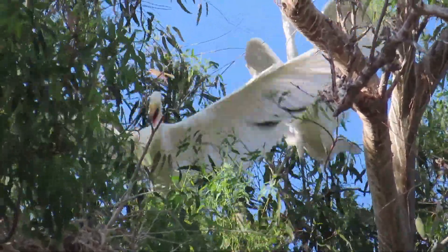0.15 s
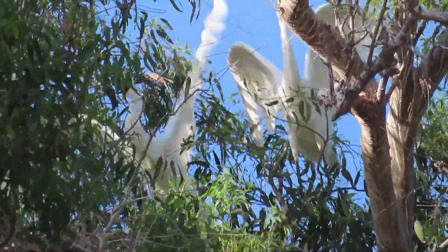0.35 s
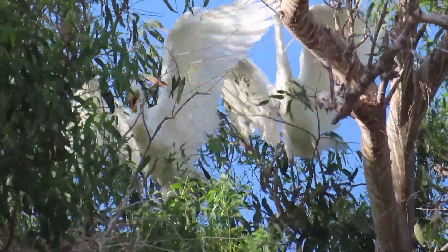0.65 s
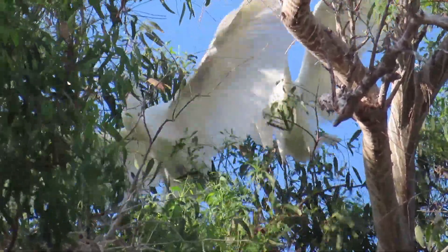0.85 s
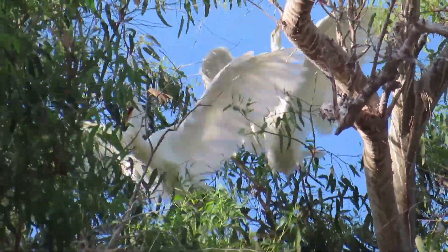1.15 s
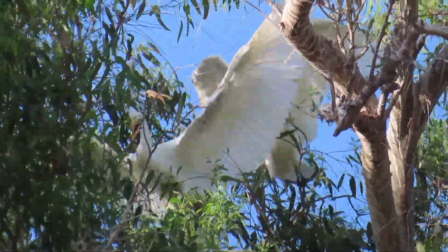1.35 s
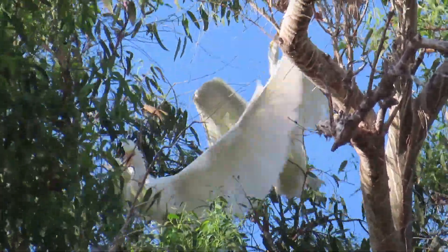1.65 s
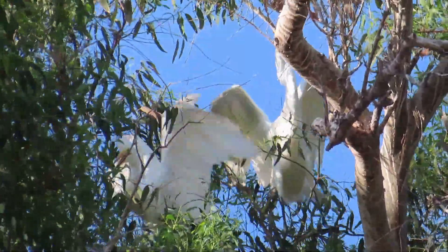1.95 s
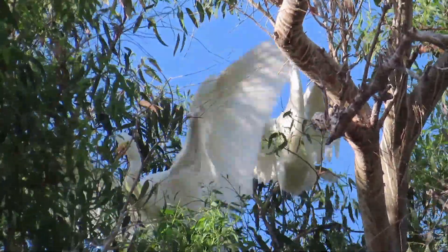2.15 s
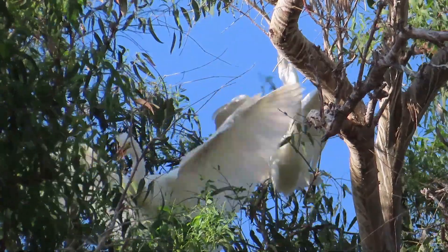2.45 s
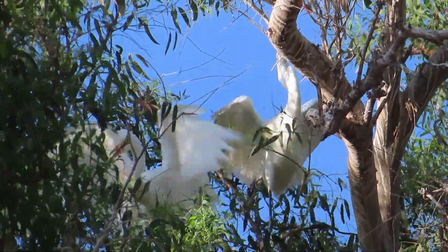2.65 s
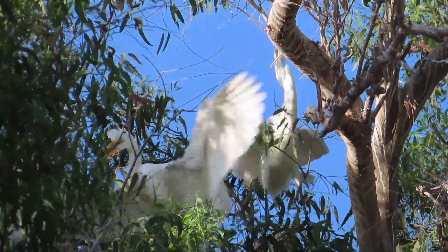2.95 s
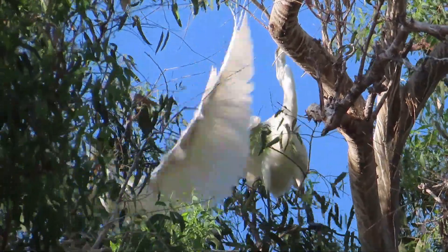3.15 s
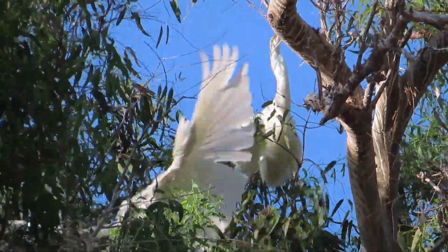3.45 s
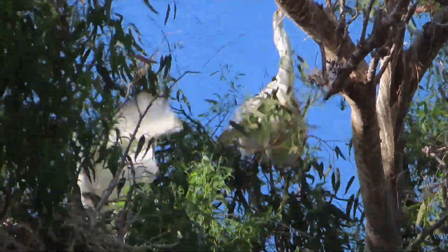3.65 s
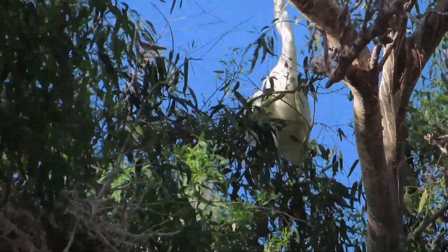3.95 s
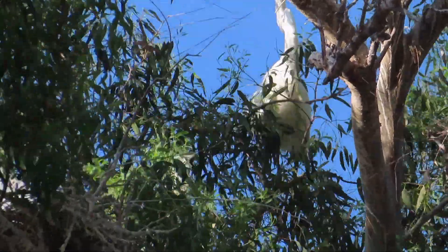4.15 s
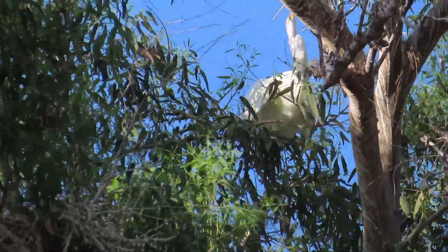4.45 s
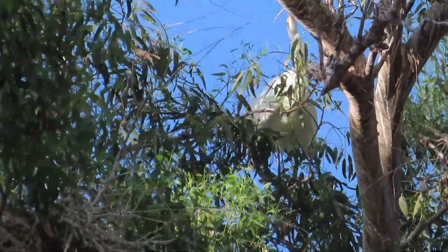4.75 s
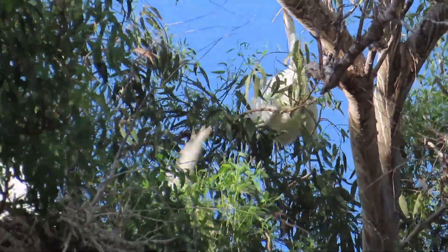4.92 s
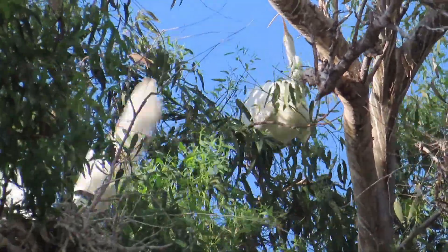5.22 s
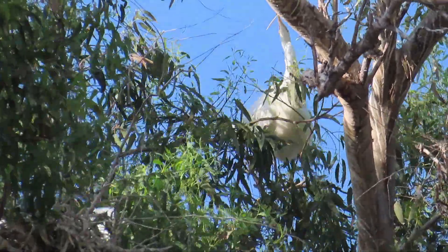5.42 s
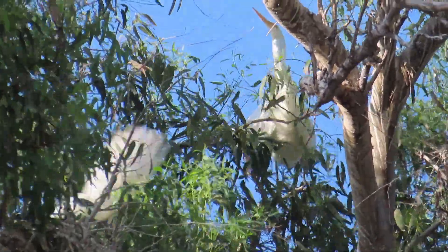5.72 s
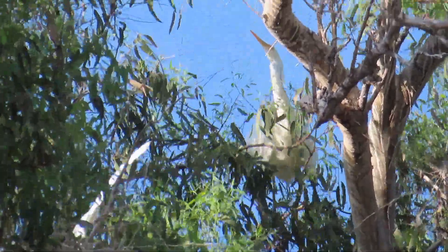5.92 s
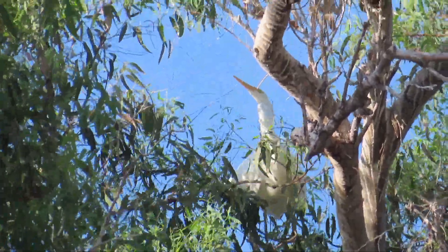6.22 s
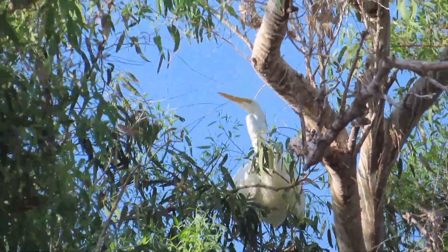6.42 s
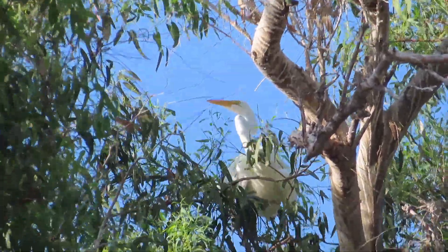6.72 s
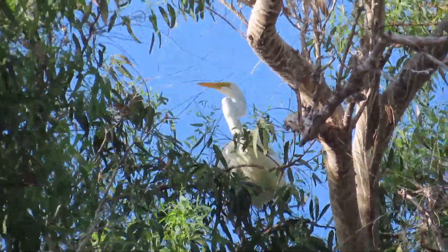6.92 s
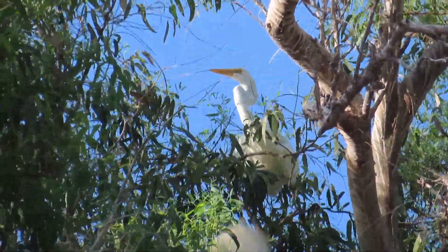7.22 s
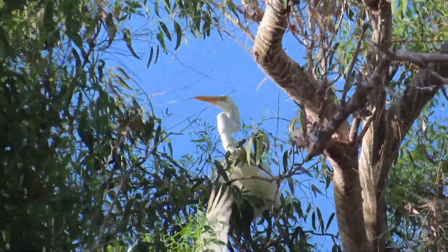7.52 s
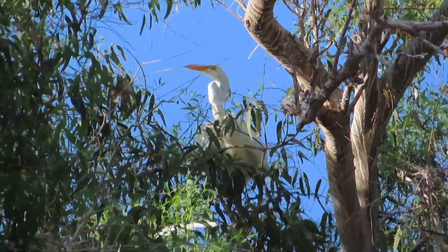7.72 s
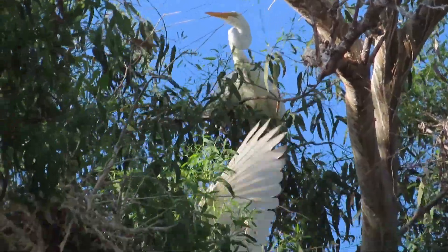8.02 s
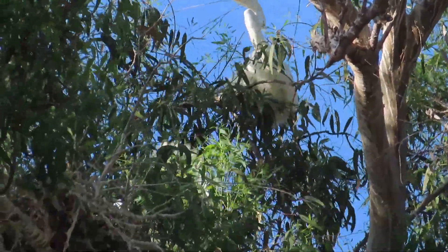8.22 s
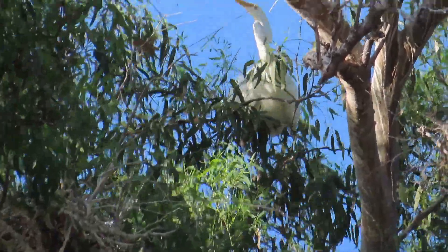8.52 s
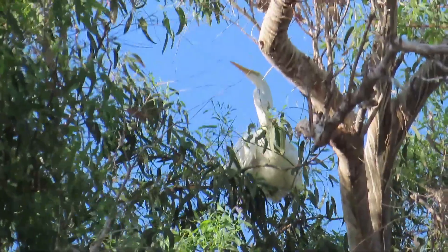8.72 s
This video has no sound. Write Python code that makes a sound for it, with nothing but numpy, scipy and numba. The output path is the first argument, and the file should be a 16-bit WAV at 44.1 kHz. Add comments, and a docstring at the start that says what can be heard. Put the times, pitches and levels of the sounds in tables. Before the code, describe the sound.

Egret chicks in a treetop nest beg with rapid, steady ticking keks, then hoarse rasping squawks, over colony hum and thumping wind.

```python
"""Short ticking keks and a long hoarse squawk open over a colony's hum: egret chicks beg in a treetop nest.
Both voices are pulse trains mixed with puffed air, ringing windpipe, throat, beak and upper resonances.
Brief clear whistles, harmonics of the calls lifted out by a narrow resonance, are made as near sines.
One ground bounce and a diffuse leafy tail echo the chicks.
Behind them lie coloured-noise hum, a throbbing low drone, and wind that rumbles and thumps on two ports."""
import sys
import numpy as np
from scipy import signal
from scipy.fft import rfft, irfft
from scipy.io import wavfile
from scipy.ndimage import uniform_filter1d
from numba import njit

SR = 44100
rng = np.random.default_rng(int(sys.argv[2]) if len(sys.argv) > 2 else 0)


def dump_mix(stems):
    """Bounce the given channels to the path in sys.argv[1] as a 16-bit WAV at rate SR."""
    frames = np.atleast_2d(stems).T  # one column per channel
    limited = np.clip(frames, -1, 1)  # hard clip at full scale
    pcm = np.round(limited * 32767).astype(np.int16)
    wavfile.write(sys.argv[1], SR, pcm)


N = 391166
T = np.arange(N) / SR


def undb(db):
    """Gain of a level in dB."""
    return 10 ** (np.asarray(db) / 20)


def level(x, db):
    """Set the rms level over the whole signal."""
    return x * undb(db) / np.sqrt(np.mean(x ** 2))


def walk(rate):
    """Random levels held 1 / rate s and smoothed twice; spread near 1."""
    hold = int(SR / rate)
    steps = np.repeat(rng.standard_normal(N // hold + 1), hold)
    return 1.51 * uniform_filter1d(uniform_filter1d(steps, hold), hold)[:N]


@njit
def svf(x, hz, width):
    """State-variable band-pass whose centre and width may move; gain 1 at the centre."""
    y, band, low = np.empty(len(x)), 0., 0.
    for i in range(len(x)):
        g, damping = np.tan(np.pi * hz[i] / SR), width[i] / hz[i]
        v = (band + g * (x[i] - low)) / (1 + g * (g + damping))
        band, low = 2 * v - band, low + 2 * g * v
        y[i] = damping * v
    return y


def ring(x, hz, width_hz):
    """A steep resonance: the band-pass twice, evened out for changes of width and set to rms 1."""
    centre, width = hz * np.ones(N), width_hz * np.ones(N)
    twice = svf(svf(x, centre, width), centre, width)
    return level(twice / np.sqrt(width), 0)


# How alike the air sounds at left and right: (f/Hz, correlation 0-1)
LIKENESS = [(30, 0.96), (130, 0.96), (300, 0.68), (640, 0.95), (2000, 0.84), (6800, 0.28), (15000, 0.038)]


def airy(spectrum):
    """Stereo noise of a given colour: mid and side are balanced per frequency to set the likeness."""
    f = np.log(np.fft.rfftfreq(N, 1 / SR) + 1)

    def read(table):
        hz, value = np.array(table).T
        return np.interp(f, np.log(hz), value)

    like, colour = np.clip(read(LIKENESS), 0, 1), undb(read(spectrum))
    mid = rfft(rng.standard_normal(N)) * colour * np.sqrt(1 + like)
    side = rfft(rng.standard_normal(N)) * colour * np.sqrt(1 - like)
    return level(irfft(np.array([mid + side, mid - side]), N), 0)


# Colour of the colony's hum: (f/Hz, relative level/dB per Hz)
HUM_COLOUR = [(140, -46), (230, -8.5), (375, -8), (768, -3.5), (1070, -11), (1630, -11), (1750, -10),
              (2010, -16), (2230, -16), (3280, -18.5), (5740, -26), (15000, -45)]
HUM_DB = -43  # centre of its slow wander


def hum():
    """Coloured stereo noise whose level wanders slowly."""
    return airy(HUM_COLOUR) * undb(HUM_DB + 1.66 * walk(1.88))


DRONE_HZ, DRONE_DB = 190.4, -46  # the level is that of the tone's peaks before the throb
THROB_S, CREST_S = .2628, 6.2  # period, and the time of one crest


def drone():
    """A far-off low tone, narrow-band noise held even, that swells and fades in a steady beat."""
    tone = ring(rng.standard_normal(N), DRONE_HZ, 7.5)
    even = tone / np.sqrt(2 * uniform_filter1d(tone ** 2, size=900))
    throb = 1 + np.cos(2 * np.pi * (T - CREST_S) / THROB_S)
    return undb(DRONE_DB) * even * throb


# Single eddies hitting the ports, before the pressure leak:
# (t/s, left level/dB, right level/dB, f/Hz of the main swing)
EDDIES = [(0.073, -13.5, -12.5, 148), (0.951, -9.5, -7.5, 126), (1.094, -14, -16, 145),
          (1.199, -7, -6.5, 207), (1.245, -12, -8.5, 174), (1.889, -6, -14, 130), (1.954, -10.5, -11, 113),
          (2.257, -6, -6.5, 133), (2.301, -14, -17, 126), (2.324, -9.5, -7.5, 190),
          (2.359, -15, -12.5, 170), (2.448, -14, -17, 128), (2.519, -15.5, -12, 121),
          (2.563, -7.5, -8.5, 169.6), (2.597, -13, -8.5, 146), (2.634, -15.5, -19.5, 160),
          (3.051, -14.5, -10.5, 200.4), (3.12, -12.5, -12, 153.3), (3.152, -8, -11, 175.3),
          (3.31, -16, -16, 189), (3.64, -19.5, -19.5, 130), (3.769, -7.5, -13.5, 257.6),
          (3.911, -21.5, -23, 167), (3.939, -26, -26, 119.4), (3.995, -27, -24.5, 173),
          (4.103, -10.5, -12, 227), (4.159, -24, -25, 147.6), (4.112, -17, -22, 148.1),
          (4.271, -9.5, -13.5, 177.8), (4.321, -10.5, -12, 153.8), (4.704, -13, -14, 124),
          (5.513, -14.5, -10, 104), (5.541, -4.5, -8.5, 240), (5.556, -2.5, -1.5, 243),
          (5.59, -3, -1.5, 226), (5.62, -10, -15, 197), (5.658, -8, -14.5, 178), (5.686, -25.5, -23, 151),
          (5.715, -22, -17.5, 296), (5.842, -35, -20, 298.5), (6.985, -11.5, -19, 145),
          (8.072, -16, -17.5, 155.1), (8.51, -14, -15, 227), (8.537, -13, -15, 206),
          (8.587, -16, -16.5, 228), (8.636, -19.5, -18, 212), (8.801, -8, -14, 173.3)]
# Slow curve of the rumble's strength, before its trim and lurching: (t/s, level/dB)
GUST_LEVEL = [(0.0, -38), (0.44, -44.5), (2.27, -38), (2.42, -37), (2.74, -39.5), (4.91, -46.5),
              (5.39, -40.5), (6.22, -49), (7.78, -46), (8.3, -38.5), (8.6, -35), (8.87, -44)]
# Colour of the rumble: (f/Hz, relative level/dB per Hz)
RUMBLE_COLOUR = [(25, -1), (60, 12), (130, 10), (220, 2), (400, -13.5), (600, -29.5), (1000, -59),
                 (3000, -110)]
# Colour of the air churned round an eddy: (f/Hz, relative level/dB per Hz)
CHURN_COLOUR = [(40, 2.5), (150, 4.5), (350, -4.5), (520, -24), (1000, -76)]
PORT_LAG_S = 0.0013  # time an eddy takes from one port to the other
PORT_LOW_HZ = 60.5  # the ports let slower pressure swings leak away


def wind():
    """Low rumble lurches at random round a slow gust curve; single eddies thump each port and churn the air."""
    gust = undb(np.interp(T, *np.transpose(GUST_LEVEL)) + 2.5 + 4.0 * walk(25))
    thumps, churn, span = np.zeros((2, N)), np.zeros((2, N)), np.arange(-3000, 3000)
    chance = rng.standard_normal((len(EDDIES), 3))
    for (s, left_db, right_db, hz), (turn, lag, late) in zip(EDDIES, chance):
        at = np.clip(int(s * SR) + span, 0, N - 1)
        for port, db in enumerate((left_db, right_db)):
            # the sign of `late` picks the port that is hit first
            cycles = (span / SR - port * PORT_LAG_S * np.sign(late)) * hz
            bump = np.exp(-(cycles / 0.58) ** 2)
            swing = np.cos(2 * np.pi * cycles + np.pi * turn + port * 0.78 * lag)
            overtone = undb(-9.0) * np.cos(2 * np.pi * 1.68 * cycles + np.pi * lag)
            thumps[port, at] += undb(db) * bump * (swing + overtone)
            churn[port, at] += undb(db - 13.5) * np.exp(-np.abs(span) / SR / 0.012)
    leak = signal.butter(1, PORT_LOW_HZ, "high", fs=SR, output="sos")
    return signal.sosfilt(leak, thumps) + churn * airy(CHURN_COLOUR) + gust * airy(RUMBLE_COLOUR)


GROUND_LAG_S, GROUND_DB = .00582, -4
LEAVES_T60_S, LEAVES_DB = 0.43, -7.5  # level before the treble is swallowed
LEAVES_TOP_HZ = 5150  # leaves swallow the treble


def echoes(voice):
    """One bounce off the ground, and a diffuse tail scattered by trunks and leaves."""
    lag = int(GROUND_LAG_S * SR)
    near = voice + undb(GROUND_DB) * np.concatenate([np.zeros(lag), voice[:-lag]])
    t = np.arange(SR // 2) / SR
    decay = undb(-60 * t / LEAVES_T60_S) * np.clip(t / 0.0033, 0, 1)
    mid, side = rng.standard_normal((2, len(t))) * decay
    tail = np.array([mid + 0.025 * side, mid - 0.25 * side])
    tail = signal.sosfilt(signal.butter(2, LEAVES_TOP_HZ, fs=SR, output="sos"), tail)
    tail = tail * undb(LEAVES_DB) / np.sqrt(np.sum(mid ** 2))
    return undb(-0.58) * near + signal.fftconvolve(voice[None], tail, axes=1)[:, :N]


@njit
def fire(hz, stretch, size, restart):
    """A pulse at each phase wrap, shared between two samples; cycle lengths vary; a restart begins a new cycle."""
    pulses, phase, p, k = np.zeros(len(hz) + 1), np.empty(len(hz)), 0., 0
    for i in range(len(hz)):
        step = hz[i] * stretch[k] / SR
        p = np.floor(p + .6) if restart[i] > 0 else p + step
        if p >= 1:
            p, k = p - 1, k + 1
            pulses[i] += size[k] * p / step
            pulses[i + 1] += size[k] * (1 - p / step)
        phase[i] = p
    return pulses[:-1], phase


def syrinx(hz, rough, restarts_s):
    """Membrane slaps mixed with air that puffs once a cycle; the rougher the voice, the more the rate stumbles."""
    length_chance, size_chance = np.clip(rng.standard_normal((2, N // 50)), -2, 2)
    stumble = 1 + .06 * rough * walk(90)
    restart = np.zeros(N)
    restart[(restarts_s * SR).astype(int)] = 1
    pulses, phase = fire(hz * stumble, 1 + .004 * length_chance, undb(1.3 * size_chance), restart)
    air = np.exp(-phase / .5) * rng.standard_normal(N)
    air_share = .55 * rough
    return np.sqrt(1 - air_share) * level(pulses, 0) + np.sqrt(air_share) * level(air, 0)


# Upper resonances that make the rasp; each call sets the first one's pitch, and spread scales the widths:
# (f/Hz, width f/Hz, relative level/dB before dulling)
RASP_RINGS = [(3410, 1840, 15), (6100, 600, 4.5), (7940, 800, 2), (10000, 2700, -4.5), (11900, 880, -13)]
WINDPIPE_HZ, WINDPIPE_WIDTH_HZ = 1327, 324  # width at spread 1


def tract(source, width_hz, throat_hz, beak_hz, rasp_hz, throat_db, beak_db, rasp_db, pipe_db, dull_db, spread):
    """Windpipe, throat, beak and upper resonances; a restless tongue shifts each and makes it flicker."""
    def restless(x, hz, width):
        return undb(1.4 * walk(60)) * ring(x, hz * (1 + .028 * walk(30)), width)

    soft = signal.sosfilt(signal.butter(4, 4600, fs=SR, output="sos"), source)
    # the neck stretches and shifts the rings above the first together
    drift = 1 + .05 * walk(5)
    # each slap rattles briefly, more in a wide-open throat
    rattle = rng.standard_normal(N) * np.sqrt(np.abs(uniform_filter1d(source ** 2, size=70)))
    smeared = source + .7 * spread * rattle
    rasp = np.zeros(N)
    for k, (hz, width, db) in enumerate(RASP_RINGS):
        centre = hz * drift if k else rasp_hz
        rasp += undb(db - k * dull_db) * restless(smeared, centre, spread * width)
    rasp = level(rasp, -1.14)
    throat = undb(throat_db) * restless(soft, throat_hz, width_hz)
    beak = undb(beak_db) * restless(soft, beak_hz, width_hz)
    windpipe = undb(pipe_db) * restless(soft, WINDPIPE_HZ, spread * WINDPIPE_WIDTH_HZ)
    # neighbours in opposite sign keep the valleys dark
    return throat - beak - windpipe + undb(rasp_db) * rasp


# Whistled notes: (start t/s, rise t/s, fall t/s, crest f/Hz, glide in Hz/s, crest level/dB)
WHISTLE_NOTES = [(0.182, 0.031, 0.046, 1980, 396, -25.5), (3.355, 0.031, 0.059, 1845, -1400, -35.5),
                 (3.365, 0.023, 0.046, 3700, -1500, -43.5), (3.44, 0.015, 0.023, 3600, -300, -46),
                 (3.565, 0.05, 0.049, 1333, -200, -39), (6.047, 0.011, 0.046, 1995, -900, -31.5),
                 (6.07, 0.025, 0.02, 2260, 0, -38), (4.65, 0.067, 0.094, 1697, -300, -48),
                 (5.11, 0.013, 0.053, 1852, -1500, -30.5), (5.82, 0.039, 0.047, 3610, -500, -44),
                 (6.353, 0.016, 0.014, 1323, 998, -33.5), (6.43, 0.033, 0.21, 3564, -1300, -38),
                 (6.51, 0.061, 0.018, 3684, -500, -36), (7.04, 0.028, 0.079, 3630, -2000, -42.5),
                 (7.075, 0.032, 0.042, 1358, -1200, -41.5), (7.435, 0.012, 0.038, 1180, 2500, -42),
                 (7.53, 0.018, 0.049, 4073, -1000, -42), (8.325, 0.018, 0.018, 1353, 500, -38.5),
                 (8.395, 0.012, 0.015, 1757, 500, -40), (8.395, 0.0392, 0.033, 3537, 2500, -39.5),
                 (6.959, 0.056, 0.062, 2790, -5000, -37.5), (7.07, 0.086, 0.029, 2353, -220, -24.5),
                 (7.17, 0.022, 0.025, 1927, -2300, -31.5), (7.5, 0.042, 0.029, 2724, -1500, -35.5),
                 (7.555, 0.039, 0.045, 1996, -3700, -43), (7.61, 0.052, 0.033, 1382, -800, -39.5),
                 (8.445, 0.024, 0.067, 2770, -700, -39), (8.526, 0.026, 0.02, 2807, -300, -33.5)]
WHISTLE_RISE_DB, WHISTLE_FALL_DB = 9.5, 4  # below the crest at start and end


def whistles():
    """Clear harmonics of the calls that a narrow resonance lifts out: each a near sine with a weak octave."""
    out, waver = np.zeros(N), walk(60)
    for start, rise, fall, hz, glide, db in WHISTLE_NOTES:
        top, end = start + rise, start + rise + fall
        on = slice(int(start * SR), int(end * SR))
        t = T[on]
        pitch = (hz + glide * (t - top)) * (1 + 0.002 * waver[on])
        turn = 2 * np.pi * np.cumsum(pitch) / SR
        tone = np.sqrt(2) * (np.sin(turn) + undb(-25) * np.sin(2 * turn))
        swell_db = np.interp(t, (start, top, end), (-WHISTLE_RISE_DB, 0, -WHISTLE_FALL_DB))
        gate = np.clip(np.minimum(t - start, end - t) / 0.0054, 0, 1)
        out[on] += tone * undb(db + swell_db) * gate
    return out


# How far each resonance lies below its crest at full sag: (start level/dB, end level/dB)
THROAT_SHAPE, BEAK_SHAPE, RASP_SHAPE, PIPE_SHAPE = (19.6, 13), (27.4, 34), (35.5, 21), (2.6, 4.4)
SWELL_POWER = 1.41  # above 1 the crest is rounded


def crest(age, at, length, db, shape, sag):
    """Level in dB that swells to a crest at age `at`, then falls to the call's end; less sag holds it up."""
    before, after = np.clip(1 - age / at, 0, 2), np.clip((age - at) / (length - at), 0, 2)
    return db - sag * (shape[0] * before ** SWELL_POWER + shape[1] * after ** SWELL_POWER)


def fade(start, end, edge_s):
    """Gate that opens and shuts in edge_s."""
    return np.clip(np.minimum(T - start, end - T) / edge_s, 0, 1)


# Squawks: (start t/s, length t/s, throat fullest after t/s, beak widest after t/s,
# first pulse f/Hz, last pulse f/Hz, throat first f/Hz, throat last f/Hz, beak first f/Hz, beak last f/Hz,
# lowest rasp ring f/Hz, throat level/dB, beak level/dB, rasp level/dB, windpipe level/dB,
# roughness 0-1, share of the usual swell and fade)
SQUAWK_CALLS = [ (0.137, 0.4, 0.064, 0.19, 294.3, 245, 2150, 2040, 3750, 3170, 4130, -41, -40.5, -46.5, -50, 0.3, 0.26),
                (3.336, 0.22, 0.042, 0.038, 313.9, 276.3, 2270, 2240, 3580, 3500, 4100, -45.5, -46.5, -59, -62, 0.22, 0.28),
                (3.539, 0.24, 0.079, 0.08, 264.8, 234, 2560, 2380, 4015, 3720, 4400, -36.5, -48, -46, -45, 0.53, 0.34),
                (4.509, 0.078, 0.035, 0.044, 262, 238, 1757, 1445, 3170, 3100, 3940, -40.5, -49.5, -53, -61.5, 0.24, 0.63),
                (4.681, 0.22, 0.19, 0.22, 273, 258, 2610, 2220, 3430, 3000, 3850, -40, -40, -44.5, -48.5, 0.17, 0.35),
                (5.08, 0.32, 0.27, 0.13, 286.7, 251.4, 1817, 1907, 3270, 2875, 3980, -34, -34, -39.5, -44, 0.54, 0.58),
                (5.349, 0.23, 0.13, 0.053, 254.8, 231.9, 2130, 2440, 3480, 3380, 4054, -33, -45.5, -48.5, -48.5, 0.48, 0.24),
                (5.672, 0.35, 0.12, 0.18, 264.5, 234.2, 2390, 2450, 3340, 3520, 4000, -39, -40.5, -44, -46.5, 0.18, 0.83),
                (6.045, 0.22, 0.032, 0.045, 292, 265.1, 2013, 1893, 3900, 3583, 3940, -40, -51.5, -76.5, -59, 0.32, 0.38),
                (6.353, 0.25, 0.086, 0.15, 289.5, 255.3, 2643, 2620, 3720, 3500, 4140, -53.5, -40.5, -42, -46, 0.02, 0.66),
                (6.583, 0.11, 0.023, 0.011, 249.5, 231.6, 2700, 2720, 3480, 3520, 3600, -43.5, -51.5, -46.5, -48.5, 0.3, 0.27),
                (6.927, 0.28, 0.064, 0.068, 271.4, 226.2, 2900, 2190, 4180, 3393, 4690, -38, -50, -40, -42, 0.32, 0.89),
                (7.431, 0.3, 0.11, 0.1, 305.1, 229.9, 2400, 2935, 3950, 4600, 4400, -40.5, -57, -44, -42, 0.4, 0.94),
                (7.966, 0.088, 0.088, 0.049, 292, 303.4, 1700, 1860, 2670, 2680, 3500, -36.5, -49, -61, -68, 0.16, 0.82),
                (8.317, 0.39, 0.25, 0.16, 291.8, 225.6, 2560, 2360, 3720, 4000, 4780, -42.5, -48, -45, -45.5, 0.4, 0.73)]
SAG_SHARE = .78  # the pulse rate reaches its last value after this share of the call
PIPE_CREST_S = 0.022  # the low windpipe ring crests early in each call


def squawks():
    """Long hoarse calls on gliding pulse rates; a rough call comes through a wide-open throat with broad rings."""
    table = np.array(SQUAWK_CALLS)
    row = np.maximum(np.searchsorted(table[:, 0] - .01, T) - 1, 0)
    (start, length, full, wide, hz, hz_end, throat, throat_end, beak, beak_end, rasp,
     throat_db, beak_db, rasp_db, pipe_db, rough, sag) = table[row].T
    age, rough = T - start, np.clip(rough, 0, 1)
    hz = hz + (hz_end - hz) * np.clip(age / (SAG_SHARE * length), 0, 1)
    progress = np.clip(age / length, 0, 1)
    throat = throat + (throat_end - throat) * progress
    beak = beak + (beak_end - beak) * progress
    levels = (crest(age, full, length, throat_db, THROAT_SHAPE, sag),
              crest(age, wide, length, beak_db, BEAK_SHAPE, sag),
              crest(age, wide, length, rasp_db, RASP_SHAPE, sag),
              crest(age, PIPE_CREST_S, length, pipe_db, PIPE_SHAPE, sag))
    source = syrinx(hz, rough, table[:, 0])
    voice = tract(source, 330 + 1100 * rough, throat, beak, rasp, *levels,
                  dull_db=0, spread=.55 + 1.2 * rough)
    return voice * sum(fade(s - .01, s + lasts + .01, .021) for s, lasts in table[:, :2])


# Keks, with levels before the trims and pitches before the slides below:
# (t/s, length t/s, beak parted after t/s, windpipe level/dB, throat level/dB,
# beak level/dB, rasp level/dB, throat f/Hz, beak f/Hz)
KEK_CALLS = [(0.021, 0.069, 0.014, -47, -32.5, -32.5, -40, 2050, 3100),
             (0.24, 0.063, 0.0096, -49, -35.5, -40, -47.5, 1920, 2650),
             (0.403, 0.055, 0.004, -38, -33, -28, -46.5, 2150, 2710),
             (0.618, 0.076, 0.014, -38.5, -35, -39, -49.5, 2060, 2720),
             (0.778, 0.074, 0.0072, -40, -38, -34, -47.5, 2130, 2800),
             (0.993, 0.085, 0.017, -40, -37, -39, -44, 1880, 2620),
             (1.154, 0.097, 0.006, -43, -36.5, -37, -43.5, 2100, 2890),
             (1.375, 0.08, 0.016, -38.5, -35.5, -51, -49, 2100, 2720),
             (1.54, 0.071, 0.004, -44, -35, -33.5, -43.5, 2100, 2740),
             (1.755, 0.072, 0.003, -36, -35.5, -46, -48.5, 1960, 2840),
             (1.906, 0.07, 0.017, -56, -35, -32, -42.5, 1864, 2824),
             (2.11, 0.084, 0.011, -38, -34, -41, -50, 2060, 2600),
             (2.27, 0.075, 0.01, -43, -35, -34, -45, 2130, 3110),
             (2.494, 0.077, 0.018, -53, -36, -32, -43.5, 1860, 2900),
             (2.655, 0.073, 0.01, -47, -33.5, -32.5, -46, 2000, 3070),
             (2.866, 0.074, 0.021, -47, -33, -36.5, -49.5, 1960, 3260),
             (3.022, 0.079, 0.007, -43, -37, -33.5, -42.5, 1942, 2729),
             (3.249, 0.081, 0.014, -43, -40.5, -37.5, -51.5, 1990, 2600),
             (3.42, 0.086, 0.0059, -45, -36, -39.5, -48, 2000, 2770),
             (3.639, 0.094, 0.01, -44, -35, -44, -44.5, 1850, 2600),
             (3.788, 0.092, 0.019, -49.5, -40, -37.5, -45, 1800, 3290),
             (4.002, 0.098, 0.025, -45, -40.5, -36, -50, 1770, 2910),
             (4.228, 0.086, 0.0041, -43, -39, -34.5, -45, 1930, 2900),
             (4.413, 0.098, 0.05, -54, -39.5, -35, -47, 1900, 2950),
             (4.639, 0.11, 0.037, -44, -42, -34.5, -51.5, 1765, 2690),
             (4.87, 0.056, 0.0094, -45, -41, -38, -54, 1770, 2800),
             (5.113, 0.074, 0.045, -38.5, -51, -37, -46, 1810, 3270),
             (5.761, 0.079, 0.006, -50.5, -54, -40, -46.5, 2350, 3340),
             (6.227, 0.063, 0.0039, -44, -44, -39, -53, 1900, 2520),
             (7.203, 0.11, 0.01, -41, -44, -40, -53.5, 2230, 2760),
             (7.827, 0.055, 0.011, -35.5, -52, -52, -74, 2220, 2780),
             (8.165, 0.064, 0.004, -41, -38.5, -37.5, -64, 2130, 2700),
             (8.38, 0.069, 0.016, -35, -41.5, -38, -47, 1710, 2497),
             (8.767, 0.04, 0.0038, -44.5, -54, -48, -69.5, 1848, 2600)]
# pulse rate at this rasp level; a harder push rasps more and pulses faster
KEK_HZ, KEK_HZ_PER_DB, KEK_RASP_DB = 234.6, 2, -47
KEK_RISE_S, KEK_FADE_S, KEK_WIDTH_HZ = 0.0066, 0.039, 560
OPEN_S, SHUT_BEAK_DB, SHUT_THROAT_DB = 0.0046, -9, -1  # the beak parts in this time; what a shut beak holds back
KEK_BEND, KEK_SLIDE = .09, .1  # spread from kek to kek of the slides of pitch and of rings, as shares


def keks():
    """Short bursts of slaps: muffled until the beak parts, then bright; the rings arch and the burst fades."""
    table = np.array(KEK_CALLS)
    row = np.maximum(np.searchsorted(table[:, 0], T) - 1, 0)
    s, length, opens, pipe_db, throat_db, beak_db, rasp_db, throat, beak = table[row].T
    age = np.clip((T - s) / length, 0, 1.3)  # as a share of the length
    burst = np.clip(np.minimum((T - s) / KEK_RISE_S, (s + length + 0.013 - T) / KEK_FADE_S), 0, 1)
    shut = np.clip((s + opens - T) / OPEN_S, 0, 1)
    arch = np.maximum(1.02 - 0.48 * (age - .45) ** 2, .5)
    chance = np.clip(rng.standard_normal((len(table), 4)), -2, 2)
    bend, throat_slide, beak_slide, rasp_shift = chance[row].T
    throat = throat * (1 + KEK_SLIDE * throat_slide * (age - .5)) * arch
    beak = beak * (1 + KEK_SLIDE * beak_slide * (age - .5)) * arch
    rasp = RASP_RINGS[0][0] * (1 + 0.062 * rasp_shift)
    hz = KEK_HZ + KEK_HZ_PER_DB * np.maximum(rasp_db - KEK_RASP_DB, -8)
    hz = hz * (1.02 + KEK_BEND * bend * (age - .5) - .3 * (age - .35) ** 2)
    # the pulse cycle restarts as the kek turns bright, so its onset is sharp
    source = syrinx(hz, .4, table[:, 0] + table[:, 2])
    # the rasp pushes hardest early, while the air pressure is high
    levels = (throat_db + SHUT_THROAT_DB * shut,
              beak_db - 3.5 + SHUT_BEAK_DB * shut,
              rasp_db + 6.0 - 5 * age + SHUT_BEAK_DB * shut,
              pipe_db - 7.5)
    return tract(source, KEK_WIDTH_HZ, throat, beak, rasp, *levels, dull_db=7.0, spread=0.98) * burst


def scene():
    """Chicks and their echoes over the hum, the drone and the wind."""
    chicks = keks() + squawks() + whistles()
    return echoes(chicks) + hum() + drone() + wind()


FULL_SCALE, TOP_HZ = .95, 15000


def record(dry):
    """Soft clipping rounds the loudest peaks; a steep low-pass cuts the top."""
    rounded = FULL_SCALE * np.tanh(dry / FULL_SCALE)
    return signal.sosfilt(signal.ellip(8, .2, 70, TOP_HZ, fs=SR, output="sos"), rounded)


dry = scene()
out = record(dry)
dump_mix(out)
```